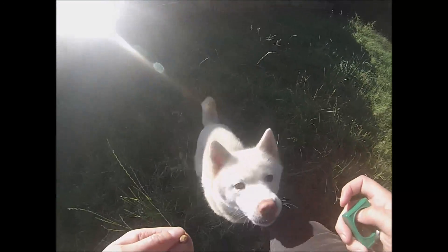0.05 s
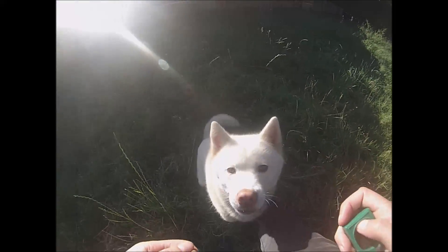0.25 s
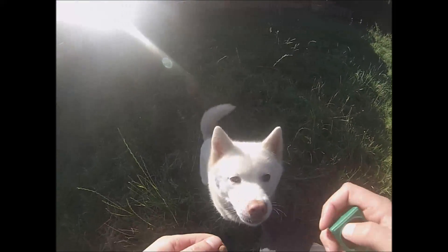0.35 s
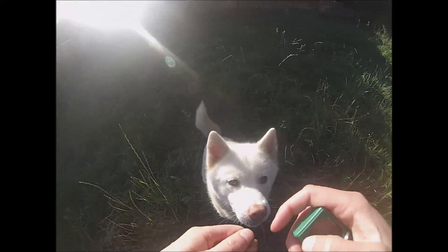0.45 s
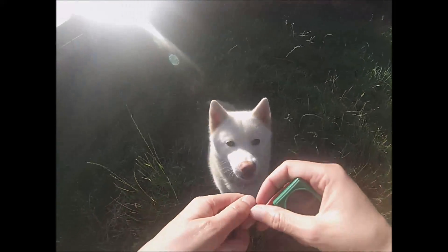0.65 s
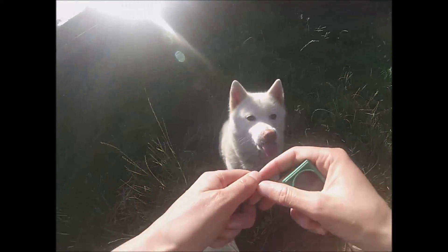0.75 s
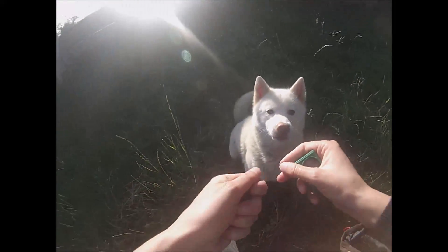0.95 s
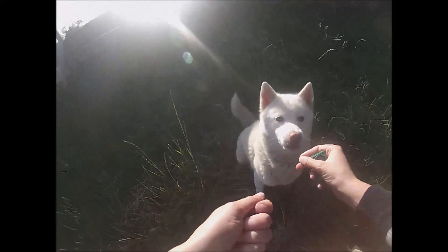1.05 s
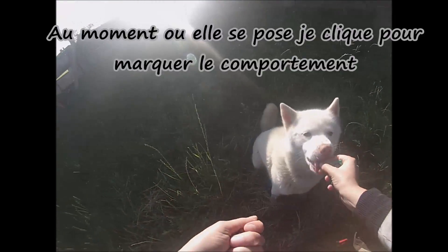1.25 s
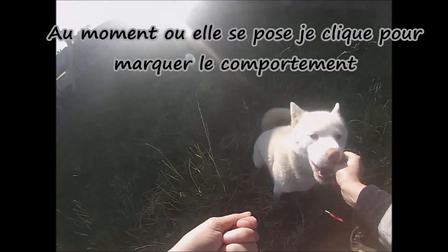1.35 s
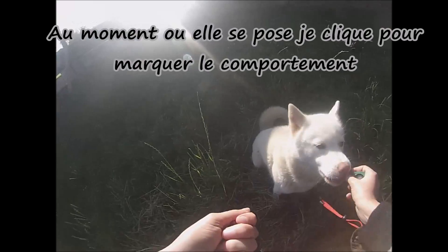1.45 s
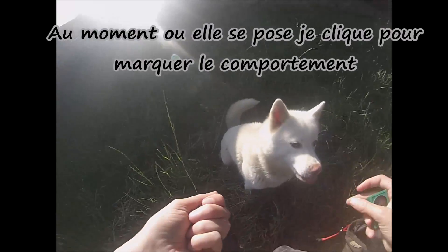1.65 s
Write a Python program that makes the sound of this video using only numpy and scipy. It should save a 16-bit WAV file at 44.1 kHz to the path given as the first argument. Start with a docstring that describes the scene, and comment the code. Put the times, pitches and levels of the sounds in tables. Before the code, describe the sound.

A dog-training clicker snaps once, then a small bird trills faintly outdoors.

```python
"""On a garden lawn, a dog-training clicker snaps once at arm's length: its steel tongue buckles,
rings the plastic case and echoes off the ground. Some way off, a small bird whistles a two-part
trill of falling notes, blurred by the trees. Hands make faint ticks and soft bumps, and light
wind rumbles on the microphone over a quiet outdoor background."""
import sys
import numpy as np
from scipy import signal
from scipy.fft import rfft, irfft
from scipy.io import wavfile

SR = 44100
rng = np.random.default_rng(int(sys.argv[2]) if len(sys.argv) > 2 else 0)


def output_pcm(signal):
    """Save a mono or channel-first signal as 16-bit PCM at the path in sys.argv[1].

    Samples are clipped to [-1, 1] before scaling.
    """
    pcm = np.clip(np.atleast_2d(signal).T, -1, 1) * 32767
    wavfile.write(sys.argv[1], SR, np.round(pcm).astype(np.int16))


N = 74970
T = np.arange(N) / SR

# The quick hits of the buckling tongue: delay_ms, relative_level_db
TONGUE_HITS = [(0, -10.5), (.32, -8), (.63, 1), (1.07, -3), (1.37, -8)]
# The tones the plastic case rings with: pitch_hz, relative_level_db, fade_s (time to drop 60 dB)
CASE_TONES = [(1065, -5, 0.018), (1675, -22, .019), (2057, -26.5, 0.031), (2888, -13.5, .022),
              (3930, -5, 0.013), (4090, -8, 0.015), (4818, -6.5, .011), (6052, -15.5, .014),
              (6680, -22.5, 0.012), (7820, -17.5, 0.015), (8980, -17.5, 0.0059), (9640, -22.5, .011),
              (11640, -16, 0.0054), (12990, -29, .011)]
# The tones the steel tongue rings with: pitch_hz, relative_level_db, fade_s
TONGUE_TONES = [(2600, -38, 0.14), (2823, -23, .054), (3055, -24.5, .048), (3319, -32.5, 0.099)]
# The bird's high note, which falls and ends in a faint upstroke: time_s, pitch_hz, relative_level_db
HIGH_SHAPE = [(0, 5160, -9), (.005, 4960, -4), (.009, 4780, -6.5), (.014, 4500, -1), (.021, 4610, -3.5),
              (.025, 4400, -20), (.033, 3964, 2), (.038, 3520, -14.5), (.040, 5200, -32.5),
              (.045, 5550, -18), (.056, 5870, -12)]
# The bird's low, falling note: time_s, pitch_hz, relative_level_db
LOW_SHAPE = [(0, 3666, -8.5), (.005, 3433, -1), (.008, 3524, -1.5), (.012, 3800, -5.5), (.016, 3565, -23),
             (.021, 3080, -11.5), (.029, 2734, -5), (.036, 2550, -11.5)]
# Each repeat of the high note: start_s, level_db, pitch_ratio, length_ratio
HIGH_TRILL = [(.733, -59, 1, 0.97), (.840, -56, 0.99, 0.97), (0.944, -55.5, 0.99, 0.98),
              (1.05, -54, 0.99, 0.99), (1.155, -53, 0.96, 1)]
# Each repeat of the low note: start_s, level_db, pitch_ratio, length_ratio
LOW_TRILL = [(1.263, -49, 1.05, 1.0), (1.335, -48.5, 1.026, 0.97), (1.405, -48.5, 1.02, 0.93),
             (1.477, -47.5, .99, 1), (1.55, -47, 1, 0.85), (1.623, -46, 1, 1.05)]
# Fingers ticking on the clicker: start_s, level_db, relative_scrape_db
FINGER_TICKS = [(.498, -47, -12), (0.6669, -38.5, -20), (0.6735, -47.5, -6.5), (1.4141, -43, -1.5),
                (1.448, -55.5, -4)]
# Soft bumps of the hands: start_s, level_db, pitch_hz, rise_s
HAND_BUMPS = [(0.04, -45, 132, 0.003), (0.527, -47, 44.3, 0.03), (0.572, -45.5, 70.6, 0.012),
              (.631, -45, 206, 0.0019), (0.787, -53, 54.3, 0.011), (0.948, -53, 160, 0.0065),
              (1.135, -50.5, 60, 0.012), (1.156, -43.5, 85, 0.0092), (1.452, -51, 35, 0.025),
              (1.499, -61.5, 204, 0.032), (1.59, -55.5, 187, 0.014)]
# How the wind rumble rises and falls: time_s, level_db
WIND_LEVELS = [(0, -71.5), (.4, -62), (.6, -53.5), (.85, -45.5), (1.05, -64), (1.45, -49.5), (1.7, -64)]
# How strong the background is from bass to treble: frequency_hz, relative_level_db
BACKGROUND_COLOUR = [(20, -4), (35, -4.5), (70, -8.5), (140, -9.5), (270, -13), (400, -15), (790, -18),
                     (1100, -20.5), (2500, -24.5), (3900, -26.5), (5300, -30), (9000, -37), (15000, -41)]
# The slight swell of the background: time_s, relative_level_db
BACKGROUND_SWELL = [(0, 0.5), (.5, 1), (1.1, 1.5), (1.7, 1.5)]


def clicker(start_s=.22465, level_db=-5.5):
    """The tongue snaps through in quick hits; the ground, the dog and the garden echo it faintly."""
    crack = amp(-41) * noise(2500, 16000) * np.exp(-T / .0034)
    hit = ring(CASE_TONES) + ring(TONGUE_TONES) + crack
    hit = band(hit, 1620, 12280, order=4)  # the small case gives off no bass
    snap = amp(level_db) * sum(amp(db) * delay(hit, start_s + ms / 1000) for ms, db in TONGUE_HITS)
    ground = amp(-31.5) * delay(scatter(snap, fade_s=.0059, top_hz=6500), seconds=.0245)
    dog = amp(-27) * scatter(snap, fade_s=.043, top_hz=7000)
    garden = amp(-39) * scatter(snap, fade_s=.2, top_hz=5950)
    return snap + ground + dog + garden


def bird():
    """A small bird sings five high notes, then six quicker low ones."""
    high = trill(HIGH_SHAPE, HIGH_TRILL, echo_db=-11, tail_db=-3)
    low = trill(LOW_SHAPE, LOW_TRILL, echo_db=-20, tail_db=-7.5)
    return high + low


def trill(shape, notes, echo_db, tail_db):
    """A run of similar notes; the trees send back one smeared echo and a longer, fading tail."""
    song = sum(whistle(shape, *row) for row in notes)
    echo = delay(scatter(song, fade_s=.029, top_hz=7000), seconds=.042)
    tail = delay(scatter(song, fade_s=.41, top_hz=7000), seconds=.012)
    return song + amp(echo_db) * echo + amp(tail_db) * tail


def whistle(shape, start_s, level_db, pitch_ratio, length_ratio):
    """One falling note that wavers a little in pitch and loudness."""
    times, hz, shape_db = np.array(shape).T
    age = (T - start_s) / length_ratio
    on_off = np.clip(np.minimum(age, times[-1] - age) / .0013 + 1, 0, 1)
    pitch_hz = pitch_ratio * np.interp(age, times, hz) * (1 + .015 * noise(37, 310))
    loudness = amp(level_db + np.interp(age, times, shape_db) + 2.5 * noise(32, 270))
    return on_off * loudness * np.sin(2 * np.pi * np.cumsum(pitch_hz) / SR)


def finger_ticks():
    """Fingers touch the clicker's case, each time with a tiny, bright scrape."""
    out = np.zeros(N)
    case = band(ring(CASE_TONES), 3150, 4400)  # a light touch rings mainly this range
    for start_s, level_db, scrape_db in FINGER_TICKS:
        scrape = amp(scrape_db) * noise(2620, 11000) * np.exp(-T / .002)
        out += amp(level_db) * delay(case + scrape, start_s)
    return out


def hand_bumps():
    """Hands bump the camera: a low tone and a little rubbing swell and die away."""
    out = np.zeros(N)
    for start_s, level_db, pitch_hz, rise_s in HAND_BUMPS:
        age = np.maximum(T - start_s, 0)
        thump = np.sin(2 * np.pi * pitch_hz * age)
        rub = amp(-10.5) * noise(pitch_hz / 2, pitch_hz * 2)
        swell = age / rise_s * np.exp(1 - age / rise_s)
        out += amp(level_db) * (thump + rub) * swell
    return out


def wind():
    """Light wind on the microphone makes a very deep rumble that comes and goes."""
    return noise(8.9, 15) * amp(np.interp(T, *np.array(WIND_LEVELS).T))


def background(level_db=-59.5):
    """A quiet, nearly steady hush from far away, strongest in the bass."""
    hz, db = np.array(BACKGROUND_COLOUR).T
    all_hz = np.arange(1, N // 2 + 2) * SR / N
    colour = amp(np.interp(np.log(all_hz), np.log(hz), db))
    hush = unit(irfft(rfft(rng.standard_normal(N)) * colour, N))
    return hush * amp(level_db + np.interp(T, *np.array(BACKGROUND_SWELL).T))


def ring(tones):
    """The fading tones of an object that is struck once."""
    return sum(amp(db) * np.sin(2 * np.pi * hz * T) * np.exp(-np.log(1000) * T / fade_s)
               for hz, db, fade_s in tones)


def scatter(x, fade_s, top_hz):
    """Many tiny echoes, as from grass and bushes, blend and drop 60 dB in fade_s."""
    tail = noise(700, top_hz) * np.exp(-np.log(1000) * T / fade_s)
    tail /= np.sqrt(np.sum(tail ** 2) * SR / 2 / top_hz)  # keeps the echo about as loud as x
    return signal.fftconvolve(x, tail)[:N]


def delay(x, seconds):
    """The same sound, a little later."""
    shift = np.exp(-2j * np.pi * np.arange(N + 1) * seconds * SR / (2 * N))
    return irfft(rfft(x, 2 * N) * shift)[:N]


def noise(lo_hz, hi_hz):
    """Noise between two frequencies, with an average strength of 1."""
    return unit(band(rng.standard_normal(N), lo_hz, hi_hz))


def band(x, lo_hz, hi_hz, order=2):
    """Keep the part of a sound between two frequencies."""
    band_pass = signal.butter(order, [lo_hz, min(hi_hz, .45 * SR)], "band", fs=SR, output="sos")
    return signal.sosfilt(band_pass, x + 1e-18)


def unit(x):
    """Scale a sound to an average strength (rms) of 1."""
    return x / np.sqrt(np.mean(x ** 2))


def amp(db):
    """Turn decibels into a number to multiply by."""
    return 10 ** (np.asarray(db) / 20)


def scene():
    """All the sounds meet at one microphone."""
    return (clicker() + bird() + finger_ticks() + hand_bumps() + background() + wind())[None]


def record(dry, top_hz=15500):
    """The camera cuts off the highest treble."""
    return signal.sosfilt(signal.ellip(8, .2, 70, top_hz, fs=SR, output="sos"), dry)


dry = scene()
out = record(dry)
output_pcm(out)
```